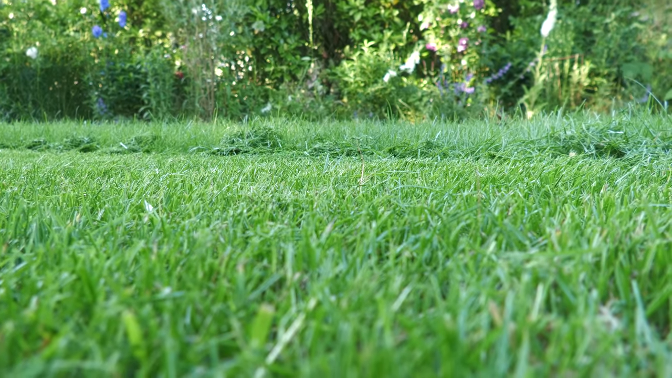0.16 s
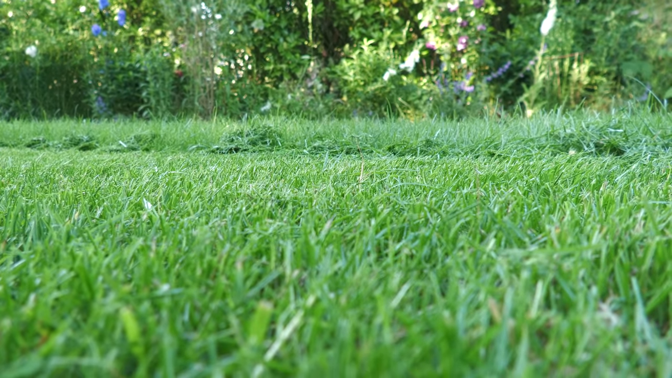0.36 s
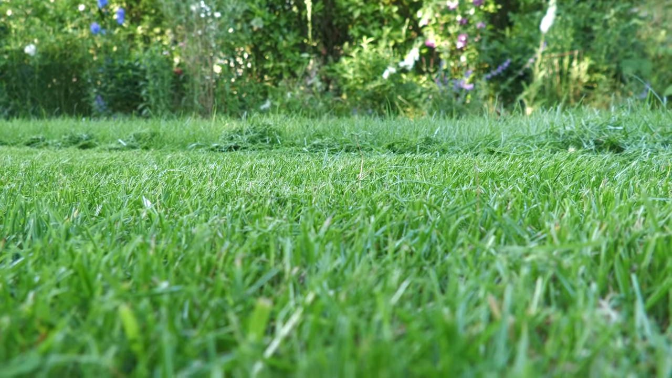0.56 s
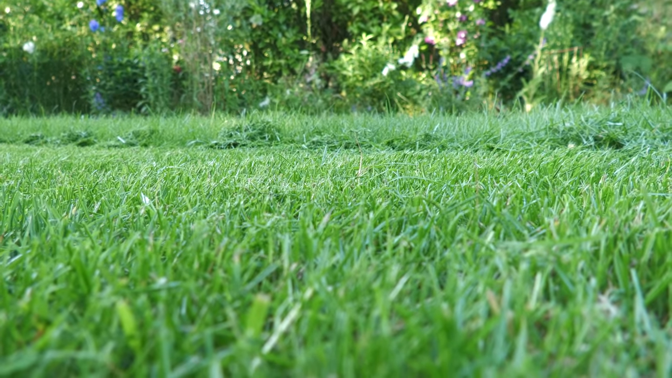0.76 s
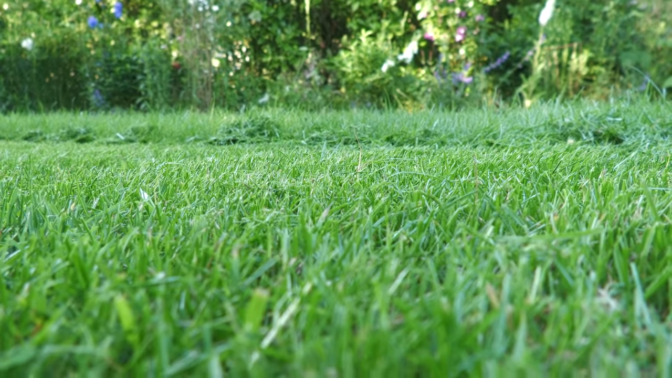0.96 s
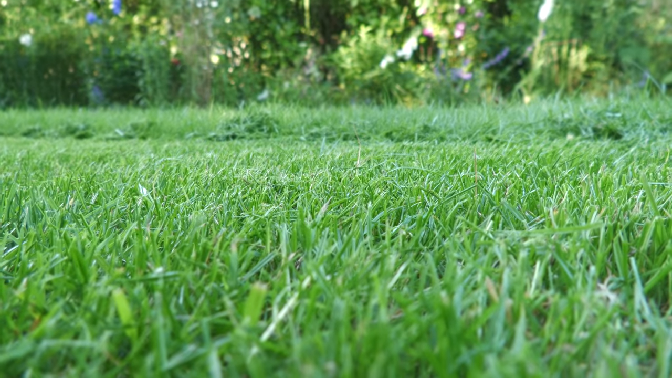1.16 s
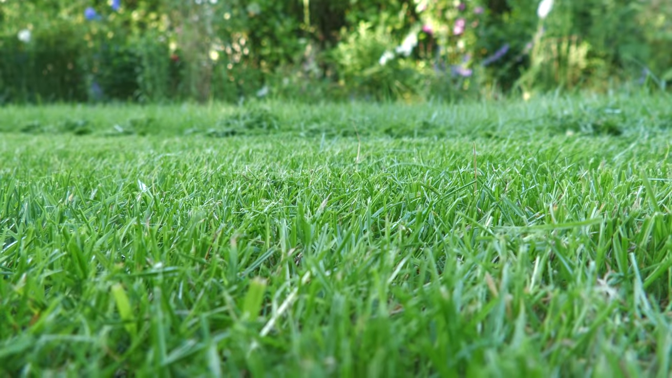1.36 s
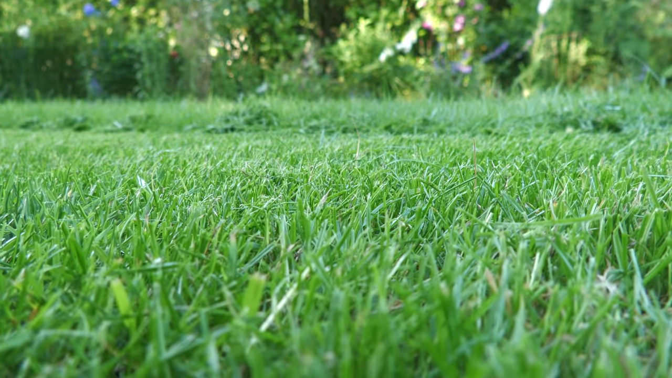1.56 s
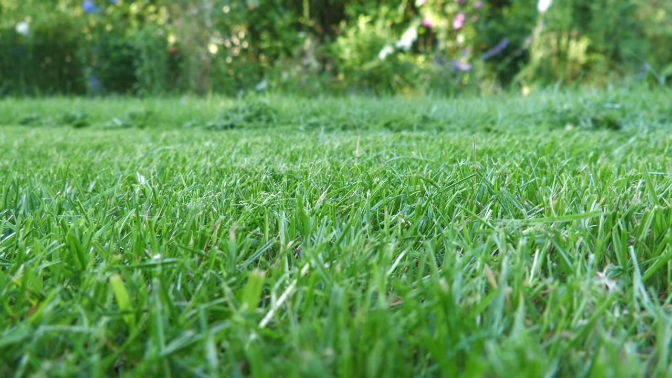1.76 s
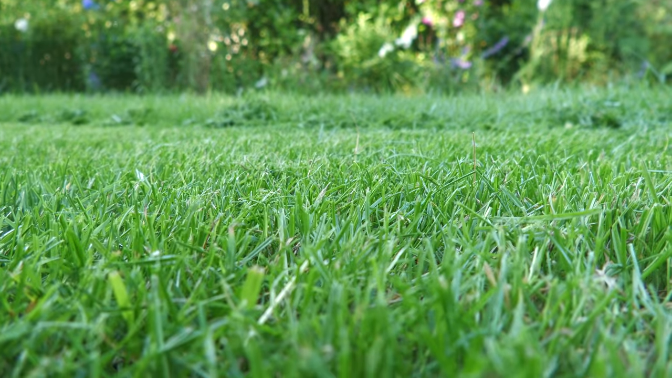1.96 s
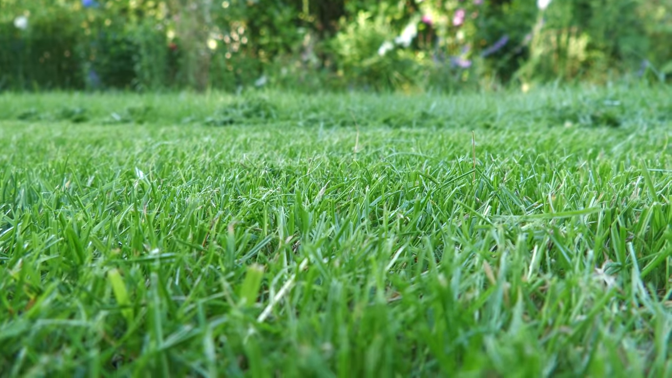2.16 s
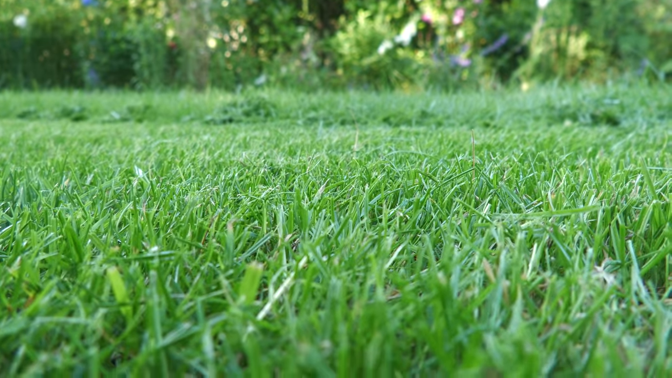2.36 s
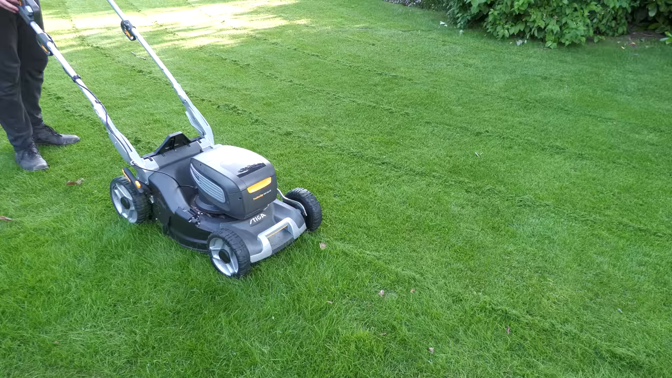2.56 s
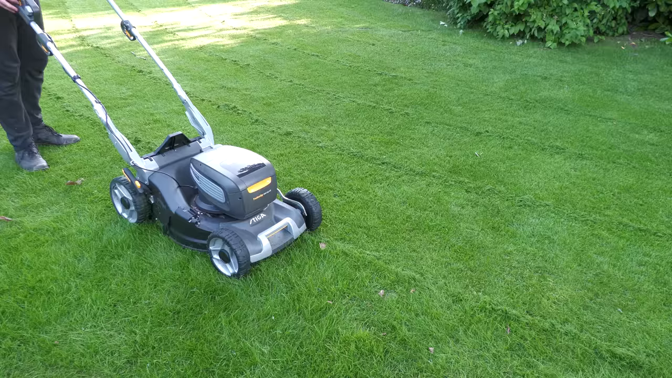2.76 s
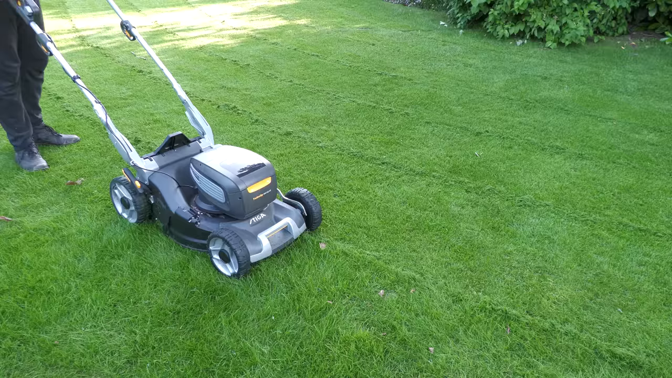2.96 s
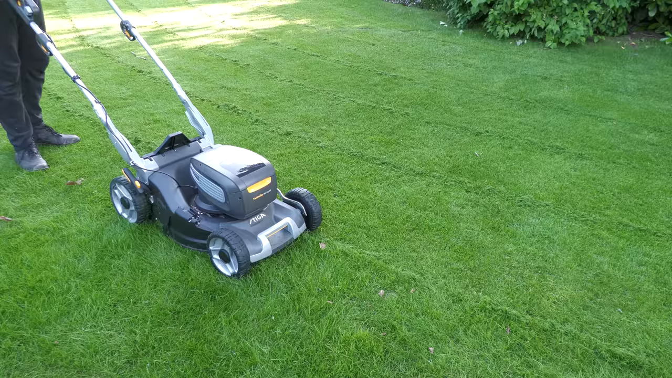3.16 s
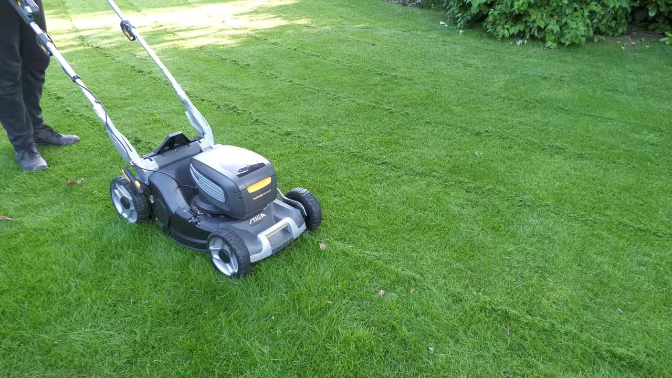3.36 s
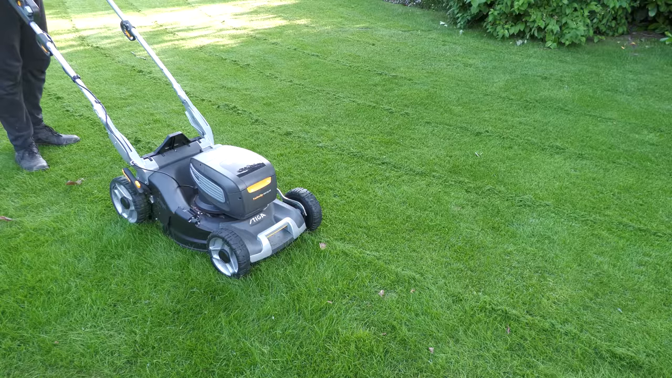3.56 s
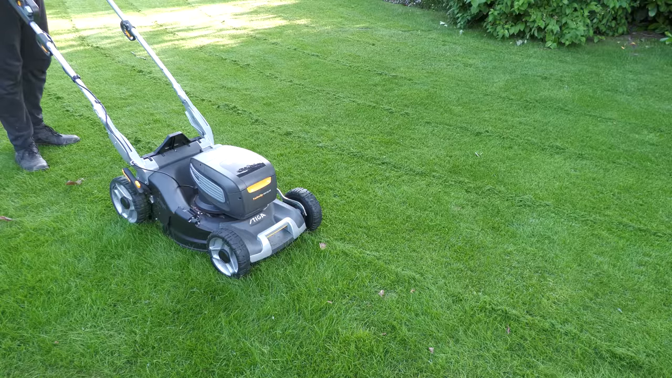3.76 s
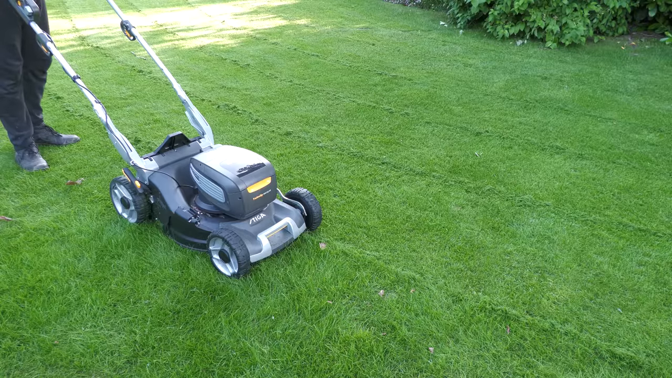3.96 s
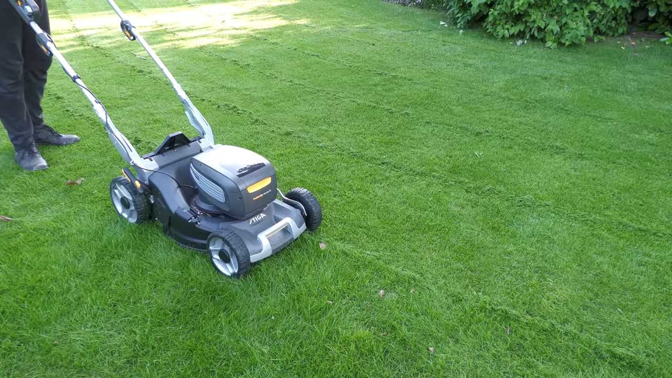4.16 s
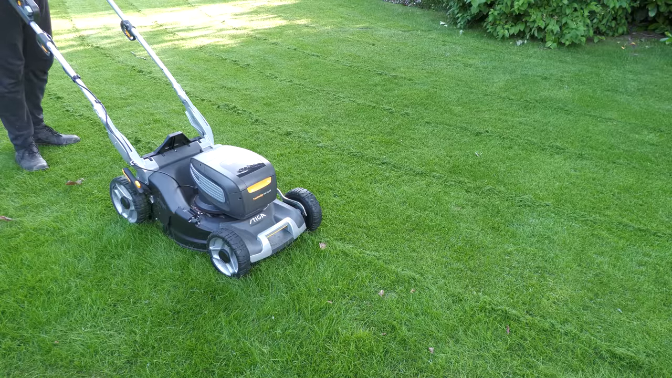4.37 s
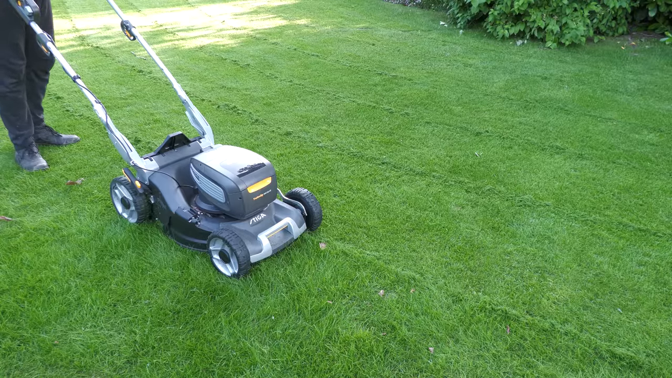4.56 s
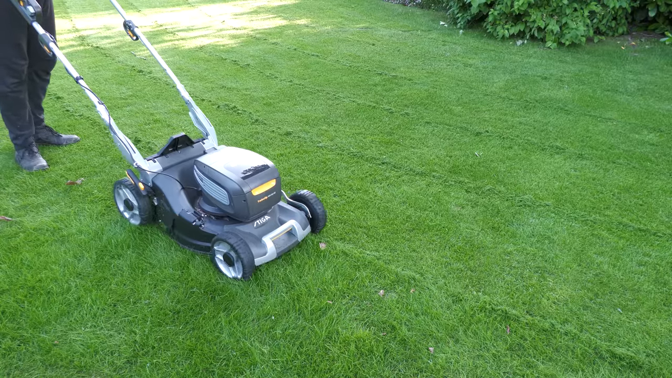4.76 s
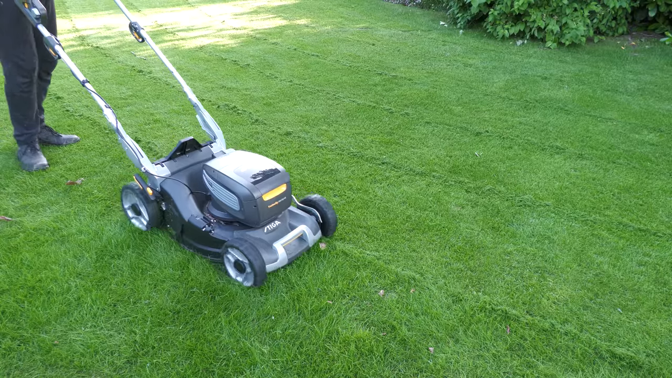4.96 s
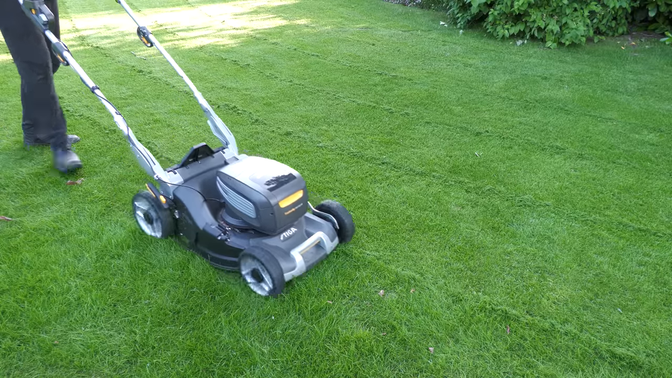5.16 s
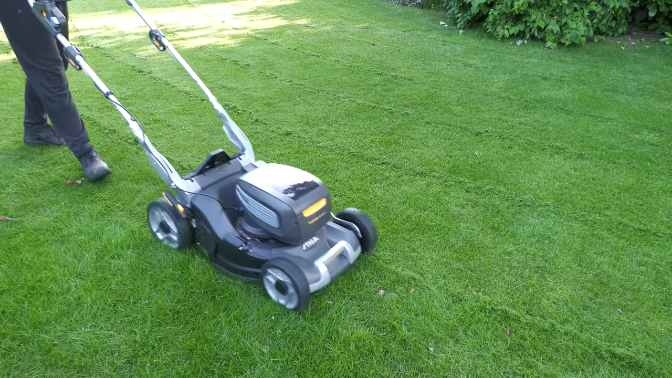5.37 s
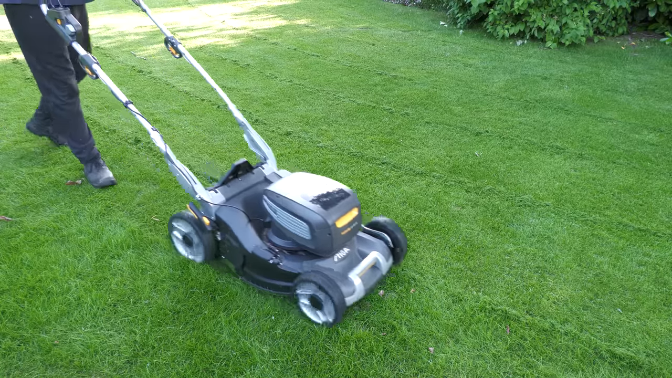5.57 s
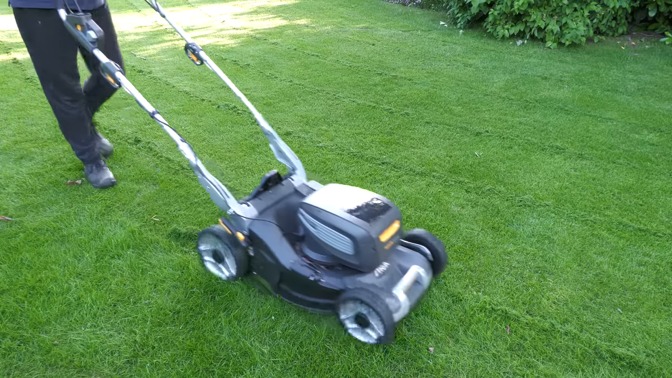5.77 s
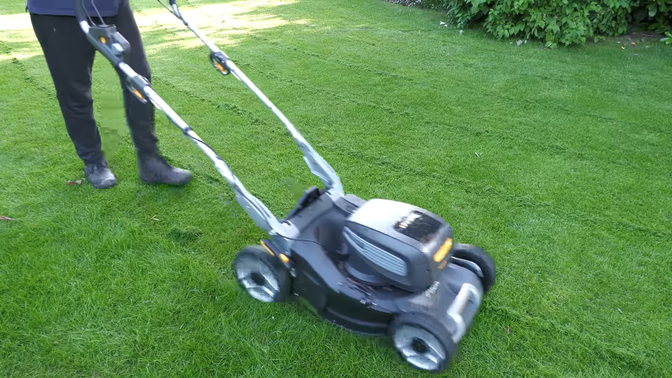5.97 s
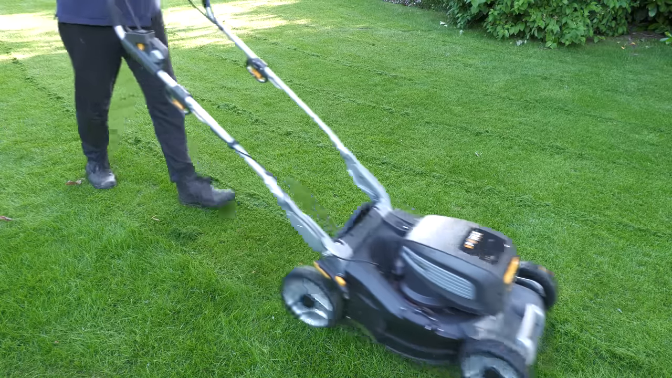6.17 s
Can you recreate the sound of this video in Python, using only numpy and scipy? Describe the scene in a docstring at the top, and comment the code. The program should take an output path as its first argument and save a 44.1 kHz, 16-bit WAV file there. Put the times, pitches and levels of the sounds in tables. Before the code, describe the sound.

Outdoors in stereo, chirping small birds with a thin leafy echo and barely audible background rush. Then a much louder electric mower close by clunks on softly, judders, and climbs within about a second to a smooth low hum and broad blade-wind roar. Clippings pepper its plastic deck. Near the end it rolls forward, sagging slightly in pitch, wavering, with sharper stalk clicks and one bump.

```python
"""A quiet garden: small birds whistle in gliding tones over a faint rush of coloured noise; then a battery
lawnmower starts a couple of metres away. Pole steps knock and drone in the deck, then merge into a rising whine.
The two-winged blade hums as a stack of lines, churns the air as pulsing noise, and flicks grass and stalks
against the deck as random crackle and short rings, the crackle louder once the mower is pushed."""
import sys
import numpy as np
from scipy import signal
from scipy.fft import rfft, irfft, next_fast_len
from scipy.io import wavfile
from scipy.ndimage import uniform_filter1d

SR = 44100
rng = np.random.default_rng(int(sys.argv[2]) if len(sys.argv) > 2 else 0)


def generate_wav(signal):
    """Clip the signal to [-1, 1] and save it as 16-bit WAV at the path in sys.argv[1]."""
    frames = np.transpose(np.atleast_2d(signal))
    scaled = np.clip(frames, -1, 1) * 32767
    pcm = np.round(scaled).astype(np.int16)
    wavfile.write(sys.argv[1], SR, pcm)


N = 273487
T = np.arange(N) / SR
SIDES = np.array([[1], [-1]])

# Spectrum of far traffic and leaves. Each row: frequency in Hz, relative level in dB.
GARDEN_SPECTRUM = [(26, -33), (45, -3), (55, -8.5), (145, -18), (218, -17), (355, -20.5), (511, -20),
                   (755, -25), (1530, -24), (2420, -31), (4340, -29), (6730, -44), (15000, -54)]
# Stereo width of the garden. Each row: frequency in Hz, side relative to mid in dB.
GARDEN_WIDTH = [(40, -43), (200, -18.5), (1000, -8), (4000, -0.5), (12000, 3.5)]
GARDEN_DB = -58.5  # in the midrange

# Notes of the nearer birds, before flutter and echo. Each row: start in seconds, length in seconds,
# start pitch in Hz, middle pitch in Hz, end pitch in Hz, level in dB, buzz from 0 to 1.
BIRD_NOTES = [(.008, 0.02, 3750, 3400, 3550, -60, 0), (.11, .033, 3800, 3050, 3820, -57.5, 0.3),
              (.16, .05, 4130, 4300, 4100, -63, 0.08), (.205, .2, 3850, 4360, 4060, -66, 0),
              (.208, 0.23, 3830, 4030, 3680, -65.5, 0.08), (0.644, .1, 5700, 5660, 5620, -69, 0.1),
              (.663, 0.016, 5470, 4460, 4240, -50.5, 0.2), (0.729, 0.12, 4380, 4600, 4350, -58, 0.25),
              (.876, 0.033, 4880, 5100, 5000, -58, .1), (.956, .059, 4900, 4690, 4250, -59, 0.14),
              (1.058, 0.11, 4600, 4450, 4300, -61.5, 0.4), (1.173, 0.071, 3480, 3300, 3340, -60, 0.44),
              (1.305, 0.054, 4770, 3790, 3100, -46.5, .4), (1.33, 0.088, 5380, 5400, 5250, -63, .26),
              (1.425, 0.13, 4530, 4420, 4340, -49, 0.03), (1.65, .045, 5300, 4870, 4800, -62, .25),
              (1.739, .013, 3300, 4240, 4920, -58, 0), (1.748, 0.17, 4880, 5360, 5640, -60.5, .15),
              (2.058, 0.055, 4750, 4140, 4030, -53.5, 0.14), (2.138, 0.059, 4020, 3830, 4000, -52, 0.03),
              (2.195, 0.12, 4650, 4500, 3980, -55.5, 0.77), (2.324, 0.027, 2850, 3160, 3030, -57, .15),
              (2.44, .08, 4560, 4400, 4510, -58, 0.14), (2.585, .125, 5780, 5500, 5490, -56.5, 0.12),
              (2.746, .06, 5300, 5220, 5100, -53, .15)]
# Random notes of the farther birds
TWITTER_HZ, TWITTER_SPREAD_OCTAVES, TWITTER_GLIDE_FRACTION = 5000, 0.18, 0.052
TWITTER_LENGTH_S, TWITTER_DB = 0.06, -73.5

# Blade speed: the motor creeps, spins up, and sags a little once the mower is pushed.
# Each row: time in seconds, blade passes per second in Hz.
BLADE_SPEED = [(2.55, 2.15), (2.68, 5.9), (2.93, 10.2), (3.0, 14.7), (3.1, 22), (3.2, 35), (3.3, 50.9),
               (3.4, 63.73), (3.55, 77.84), (3.7, 87.3), (3.89, 95.04), (4.12, 99.8), (4.5, 101),
               (4.75, 100.4), (5.3, 95.9), (5.76, 98.04), (5.84, 96.7), (6.15, 96.2)]
SWITCH_ON_S = 2.553
TORQUE_S, TORQUE_RISE_S = 2.605, 0.024  # the motor takes up the load
PUSH_S, PUSH_RAMP_S = 4.75, 0.3  # the mower starts to roll
NEARER_DB_PER_S = 1.28  # louder as it approaches
# Stereo placing of the mower. Each row: frequency in Hz, left minus right in dB.
MOWER_PAN = [(90, -2.07), (300, -1), (1000, -0.7), (4500, .5), (8000, 0.5), (12000, -3.5)]
# Slow drift in stereo, added to the placing of the mower. Each row: time in seconds, left minus right in dB.
MOWER_DRIFT = [(2.6, -1.4), (3.5, -0.93), (4.3, 0), (6.2, 0.13)]

# Resonances of the plastic deck. Each row: frequency in Hz, width in Hz, level in dB.
DECK_MODES = [(220, 32, -8.5), (337, 210, -4), (417, 23.5, 2.5), (505, 4.6, -8), (650, 9.5, -4.5),
              (1133, 290, -9.5)]
# How well the deck radiates. Each row: frequency in Hz, gain in dB.
DECK_RADIATION = [(90, -26), (160, 5.5), (700, -6), (900, -14), (1200, -16.5), (2500, -23)]
# Blows on the deck: the drive takes hold, a bump in the lawn. Each row: time in seconds, peak in dB.
DECK_BLOWS = [(2.553, -32), (5.806, -9.5)]

# Cogging of the motor's poles. Each row: multiple of the blade rate, relative level in dB.
COGGING_LINES = [(6, -13), (12, 2), (24, -5.5)]
JUDDER_DB, WHINE_DB = -29.5, -28
SMOOTH_HZ, SMOOTH_WIDTH_HZ = 81, 4  # above this blade rate the judder dies away
CRITICAL_HZ, CRITICAL_WIDTH_HZ, CRITICAL_DB = 39.4, 5, 5.5  # blade rate that shakes the motor on its mount

# Spectrum of cut grass on the deck. Each row: frequency in Hz, relative level in dB.
CRACKLE_SPECTRUM = [(800, -15), (2000, -7), (3600, 7.5), (5200, 13), (6500, 0.5), (10000, 0), (13000, -30),
                    (16000, -48)]
# Stalks and twigs struck by the blade.
# Each row: time in seconds, relative peak in dB, ring in Hz, relative treble in dB.
STALK_STRIKES = [(3.584, -19, 4200, -21.5), (4.155, -17.5, 3200, -10), (4.7122, -18.5, 4230, -12),
                 (5.1164, -17, 3325, -14), (5.2515, -20, 3600, -26), (5.2624, -17.5, 3700, -26),
                 (5.3223, -17, 4220, -29), (5.6218, -16, 4170, -27), (5.7618, -13.5, 3375, -11),
                 (5.806, -16, 4250, -16), (5.899, -19.5, 3810, 1), (5.937, -15, 3440, -16),
                 (6.1769, -16.5, 3228, -25), (6.1873, -26, 4300, -14)]
# Treble colour of a struck stalk. Each row: frequency in Hz, gain in dB.
STALK_COLOUR = [(4000, 4.5), (6500, 3.5), (10500, -3.5), (13000, -6), (15000, -24)]

# Three bands of blade-tip turbulence. Each row: frequency in Hz, relative level in dB.
ROAR_SPECTRUM = [(35, -30), (70, -20), (120, -10), (170, 0), (230, 0), (340, -1), (450, -1), (650, 1.5),
                 (800, -0.5), (1150, -1), (1450, -6.5), (2050, -7), (2800, -15), (4000, -62)]
HISS_SPECTRUM = [(2300, -41), (2900, -1), (3350, 5.5), (4200, -0.5), (5200, -6), (6000, -11.5), (7500, -60)]
SPRAY_SPECTRUM = [(4800, -2.5), (6200, 3), (7500, 3.5), (9200, 2), (11000, -3.5), (12200, -9.5),
                  (13600, -28), (15000, -23), (16000, -29)]
# Stereo width of the turbulence. Each row: frequency in Hz, side relative to mid in dB.
MOWER_WIDTH = [(100, -34), (500, -26), (1000, -25), (2000, -12.5), (4500, -13.5), (8000, -7), (10500, -7),
               (12500, 7.5)]
# Tufts of grass brushed by the blade. Each row: centre in seconds, length in seconds, level in dB.
GRASS_TUFTS = [(2.765, 0.11, -51), (2.875, 0.068, -48), (5.744, 0.038, -36.5), (5.936, 0.061, -42)]
ROAR_DB, HISS_DB, SPRAY_DB, CRACKLE_DB = -24.5, -35.5, -45, -46  # full speed, before rolling and swish

# Blade hum. Each row: multiple of the blade rate, relative level in dB,
# blade rate at which the line is fully grown in Hz, change when rolling in dB.
HUM_LINES = [(1, -23.5, 95, 2.6), (2, -24, 89, -0.3), (2.5, -55, 90.5, 10), (3, -30, 97, 1),
             (4, -37, 50, 3.5), (5, -30, 74, -6.5), (6, -32, 89, -7.5), (6.5, -38, 87.8, -2.5),
             (7, -35.5, 49, 3), (10, -35.5, 90.1, -5), (13, -36, 100, -14)]
# The deck favours the lower lines. Each row: frequency in Hz, gain in dB.
HUM_COLOUR = [(450, -0.5), (560, 1), (610, -4), (680, -10.5), (1300, -4)]
# Wavering of the hum while rolling.
# Each row: time in seconds, change of multiple 2 in dB, change of multiple 3 in dB.
HUM_WAVER = [(4.79, -0.5, 5.5), (4.91, -11, -10), (5.06, -12, 2.5), (5.2, -8, -3.5), (5.32, 1.5, 4),
             (5.55, -0.5, -9), (5.75, -2.5, -6), (6.03, -1.5, 1), (6.13, -7.5, 3)]
HUM_POWER = 4.25  # amplitude grows with this power of the speed
SHAKE_STILL, SHAKE_ROLLING = 0.22, 0.58  # unsteadiness of the hum

TOP_HZ = 15800


def undb(db):
    """Decibels to gain."""
    return 10 ** (np.asarray(db) / 20)


def unit(x):
    """Scale to rms 1."""
    return x / np.sqrt(np.mean(x ** 2))


def curves(table):
    """The columns of a table, joined by straight lines in time."""
    time_s, *columns = np.transpose(table)
    return [np.interp(T, time_s, column) for column in columns]


def fade_in(start_s, length_s):
    """A ramp from 0 to 1."""
    return np.clip((T - start_s) / length_s, 0, 1)


def grown(blade_hz, full_hz, power, rest_db=-120):
    """Gain that rises from its resting level as a power of the speed, up to about 1."""
    return np.hypot(np.minimum(blade_hz / full_hz, 1) ** power, undb(rest_db))


def colour(x, points):
    """Filter by a spectrum of (Hz, dB) points, joined on a log frequency axis."""
    hz, db = np.transpose(points)
    size = next_fast_len(N, True)
    freq_hz = np.maximum(np.fft.rfftfreq(size, 1 / SR), 1)
    gain = undb(np.interp(np.log(freq_hz), np.log(hz), db))
    return irfft(rfft(x, size) * gain, size)[..., :N]


def noise(points):
    """Coloured noise of rms 1."""
    return unit(colour(rng.standard_normal(N), points))


def walk(rate_hz):
    """Random levels held for 1 / rate and smoothed twice; spread near 1."""
    hold = int(SR / rate_hz)
    steps = np.repeat(rng.standard_normal(N // hold + 1), hold)
    return 1.3 * uniform_filter1d(uniform_filter1d(steps, hold), hold)[:N]


def resonate(x, hz, width_hz):
    """One resonance, gain 1 at its centre."""
    return signal.lfilter(*signal.iirpeak(hz, hz / width_hz, fs=SR), x)


def grains(rate_hz, spread_db):
    """Random impulses of either sign, a few much stronger than the rest."""
    size = np.minimum(rng.exponential(size=N), 3)
    struck = rng.random(N) < rate_hz / SR
    return struck * rng.choice([-1, 1], N) * undb(spread_db * size)


def garden():
    """A faint, slowly swelling rush of far traffic and leaves."""
    mid, side = noise(GARDEN_SPECTRUM), noise(GARDEN_SPECTRUM)
    midrange = colour(mid, [(90, -60), (100, 0), (2500, 0), (2700, -60)]).std()
    level = undb(GARDEN_DB + 0.5 * walk(4.0))
    return level * (mid + SIDES * colour(side, GARDEN_WIDTH)) / midrange


def hedges(x, t60_s, wet_db):
    """Leaves and trunks scatter a thin, late echo to each side."""
    t = T[:SR]
    tail = rng.standard_normal((2, SR)) * undb(-60 * t / t60_s) * np.minimum(t / 0.013, 1)
    tail /= np.sqrt(np.sum(tail ** 2, axis=1, keepdims=True))
    return x + undb(wet_db) * signal.fftconvolve(x[None], tail, axes=1)[:, :N]


def twitter(count):
    """Faint random notes from farther birds, spread through the scene."""
    notes = []
    for k, (when, pitch, glide, length) in enumerate(rng.random((count, 4))):
        start_s = (k + when) / (count + 2) * N / SR
        length_s = TWITTER_LENGTH_S * (0.5 + length)
        hz = TWITTER_HZ * 2 ** (TWITTER_SPREAD_OCTAVES * (2 * pitch - 1))
        glide_hz = hz * TWITTER_GLIDE_FRACTION * (2 * glide - 1)
        notes.append((start_s, length_s, hz + glide_hz, hz, hz - glide_hz, TWITTER_DB, 0.35))
    return notes


def birds():
    """Whistled glides; in buzzy notes the pitch shakes quickly and unevenly."""
    song, shake = np.zeros(N), walk(750)
    for start_s, length_s, start_hz, middle_hz, end_hz, db, buzz in BIRD_NOTES + twitter(count=42):
        u = np.linspace(0, 1, int(length_s * SR))
        i = max(int(start_s * SR), 0)
        hz = np.polyval(np.polyfit([0, 0.5, 1], [start_hz, middle_hz, end_hz], 2), u)
        hz = hz + buzz * 520 * shake[i:i + len(u)]
        swell = np.clip(np.minimum(u * length_s / 0.0024, 6 * (1 - u)), 0, 1)
        whistle = np.sin(2 * np.pi * np.cumsum(hz) / SR)
        song[i:i + len(u)] += np.sqrt(2) * undb(db) * swell * whistle
    return hedges(song * undb(2.4 * walk(70)), t60_s=0.75, wet_db=0)


def deck(force):
    """The plastic deck rings to a force."""
    return sum(undb(db) * resonate(force, hz, width_hz) for hz, width_hz, db in DECK_MODES)


def blows():
    """A short push thumps the deck, whose sharpest mode rings on."""
    out = np.zeros(N)
    ring_hz, ring_width_hz, _ = min(DECK_MODES, key=lambda mode: mode[1])
    for time_s, peak_db in DECK_BLOWS:
        push = 1.0 * (np.arange(N) == int(time_s * SR))
        ring = deck(push) + 7.0 * resonate(push, ring_hz, ring_width_hz)
        ring = colour(ring, [(200, -19), (400, 7), (650, 1), (1500, -17), (4000, -18)])
        out += undb(peak_db) * ring / np.abs(ring).max()
    return out


def clippings(angle, blade_hz, rolling):
    """Cut grass peppers the deck in bursts; thicker stalks rattle against it for a few milliseconds."""
    bursts = grains(rate_hz=900, spread_db=6) * undb(4.8 * walk(24) + 2.5 * np.cos(angle))
    crackle_gain = undb(CRACKLE_DB + 1.49 * rolling) * grown(blade_hz, full_hz=79, power=1.5)
    crackle = unit(colour(bursts, CRACKLE_SPECTRUM)) * crackle_gain
    ticks, t = np.zeros((2, N)), T[:SR // 20]
    envelope = (np.exp(-t / 0.0045) + 0.2 * np.exp(-t / 0.015)) * np.minimum(t / 0.000848, 1)
    for time_s, peak_db, hz, treble_db in STALK_STRIKES:
        crack = rng.standard_normal((3, len(t))) * envelope
        tick = resonate(crack, hz, 1740) + undb(treble_db + 4.5) * resonate(crack, 8326, 2900)
        tick = tick[0] + 0.085 * tick[1:]  # shared centre, a little different on each side
        i = int(time_s * SR)
        ticks[:, i:i + len(t)] += (undb(peak_db - 4.0) * tick / np.abs(tick).max())[:, :N - i]
    return crackle * fade_in(TORQUE_S, TORQUE_RISE_S) + colour(ticks, STALK_COLOUR)


def air(angle, blade_hz, rolling):
    """Blade-tip turbulence: a roar in the deck, and a hiss and spray that pulse with the wings and swell in tufts."""
    tufts = sum(undb(db) * np.exp(-(2 * (T - centre_s) / length_s) ** 2)
                for centre_s, length_s, db in GRASS_TUFTS)
    stream = np.interp(blade_hz, [0, 100], [0.62, 1])  # past its first swell the hiss grows only slowly
    roar = undb(ROAR_DB + 0.56 * rolling) * grown(blade_hz, full_hz=100.8, power=1.46, rest_db=-25.0)
    hiss = undb(HISS_DB) * grown(blade_hz, full_hz=52.4, power=1.34, rest_db=-15.5) * stream
    hiss = np.hypot(hiss, tufts)
    spray = undb(SPRAY_DB + 2.2 * rolling) * grown(blade_hz, full_hz=52, power=1.22, rest_db=-27) * stream
    spray = np.hypot(spray, undb(-5) * tufts)
    swish = np.cos(angle) + 0.7 * np.cos(1.5 * angle)
    roar = roar * undb(0.6 * swish + 0.97 * walk(30))
    hiss = hiss * undb(0.7 * swish + 0.75 * walk(28.2))
    spray = spray * undb(2.6 * swish + 0.96 * walk(35))
    mid, side = (roar * noise(ROAR_SPECTRUM) + hiss * noise(HISS_SPECTRUM) + spray * noise(SPRAY_SPECTRUM)
                 for _ in range(2))
    return (mid + SIDES * colour(side, MOWER_WIDTH)) * fade_in(SWITCH_ON_S, 0.0025)


def blade(angle, blade_hz, rolling):
    """The two wings sweep out a stack of lines; turbulence shakes the upper ones most, more so when rolling."""
    waver_db = dict(zip((2, 3), curves(HUM_WAVER)))
    unsteadiness = SHAKE_STILL + (SHAKE_ROLLING - SHAKE_STILL) * rolling
    hum = 0
    for k, db, full_hz, rolling_db in HUM_LINES:
        shake = min(k, 6) * unsteadiness
        level_db = db + rolling_db * rolling + waver_db.get(k, 0)
        level_db = level_db + shake * (0.86 * walk(18) + 0.74 * walk(7))
        lag = 2 * np.pi * rng.random() * (k > 3)  # random phase for the upper lines only
        phase = k * angle + 0.53 + lag + 0.35 * shake * walk(16)
        hum = hum - undb(level_db) * grown(blade_hz, full_hz, HUM_POWER) * np.cos(phase)
    return np.sqrt(2) * colour(hum, HUM_COLOUR)


def motor(angle, blade_hz):
    """At low speed each pole step knocks the deck and keeps it droning; the steps merge into a rising whine."""
    pole = 12 * angle / (2 * np.pi)  # pole steps so far
    pole_hz = np.gradient(pole) * SR
    steps = np.diff(np.floor(pole), prepend=0) * undb(2.2 * rng.standard_normal(N))
    knocks = steps * (1 + 0.4 * np.cos(np.pi * pole))  # alternate steps are stronger
    knocks = knocks + 0.33 * grains(rate_hz=700, spread_db=2.5)
    judder = unit(colour(deck(knocks / np.sqrt(1 + pole_hz / 90)), DECK_RADIATION))

    drone = 0
    for hz, width_hz, db in DECK_MODES[2:]:
        gain = undb(db + 2 * walk(25.02) - hz / 220)
        drone = drone + gain * np.sin(2 * np.pi * hz * T + width_hz / 60 * walk(30))
    drone = unit(drone)

    slip = (pole_hz / 950) ** 2 * walk(110)  # the faster it turns, the rougher the whine
    cogging = sum(undb(db + walk(24.76)) * np.sin(k * angle + slip) for k, db in COGGING_LINES)
    whine = colour(deck(cogging) + 0.38 * cogging, DECK_RADIATION)

    unsteady = 1 / (1 + np.exp((blade_hz - SMOOTH_HZ) / SMOOTH_WIDTH_HZ))
    judder_gain = undb(JUDDER_DB) * grown(blade_hz, full_hz=20.8, power=0.74) * unsteady
    mount_db = CRITICAL_DB * np.exp(-((blade_hz - CRITICAL_HZ) / CRITICAL_WIDTH_HZ) ** 2)
    whine_gain = undb(WHINE_DB + mount_db) * grown(blade_hz, full_hz=37.5, power=5.8, rest_db=-9.5)
    running = judder_gain * (0.78 * judder + 0.46 * drone) + whine_gain * whine
    return running * fade_in(TORQUE_S, TORQUE_RISE_S)


def mower():
    """One shaft drives motor, blade, air and clippings; pushing changes the cutting and brings the mower nearer."""
    blade_hz, = curves(BLADE_SPEED)
    angle = 2 * np.pi * np.cumsum(blade_hz) / SR
    rolling = fade_in(PUSH_S, PUSH_RAMP_S)
    cutting = blade(angle, blade_hz, rolling) + air(angle, blade_hz, rolling)
    cutting = cutting + clippings(angle, blade_hz, rolling)
    nearer = undb(NEARER_DB_PER_S * np.maximum(T - PUSH_S, 0))
    sound = blows() + (motor(angle, blade_hz) + cutting) * nearer
    placed = [colour(ear, [(hz, sign * db / 2) for hz, db in MOWER_PAN])
              for ear, sign in zip(sound, (1, -1))]
    return np.array(placed) * undb(SIDES * curves(MOWER_DRIFT)[0] / 2)


def scene():
    """Garden, birds and mower add up in the air."""
    return garden() + birds() + mower()


def record(dry):
    """A steep low-pass cuts the top; a constant offset moves the wave slightly off zero."""
    low_pass = signal.ellip(8, 0.2, 70, TOP_HZ, fs=SR, output="sos")
    return signal.sosfilt(low_pass, dry) + 0.0143


dry = scene()
out = record(dry)
generate_wav(out)
```